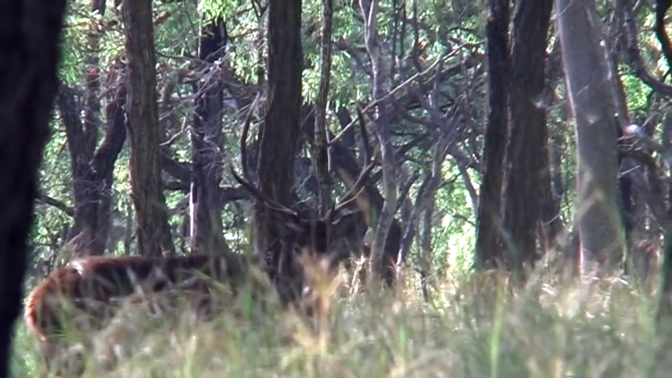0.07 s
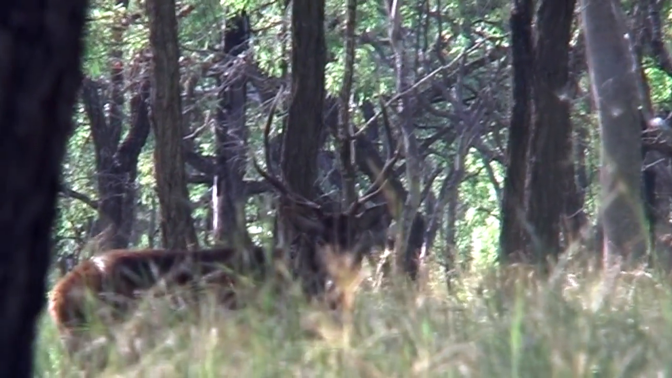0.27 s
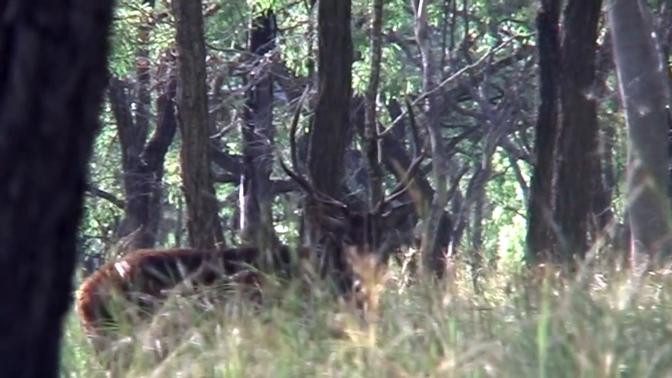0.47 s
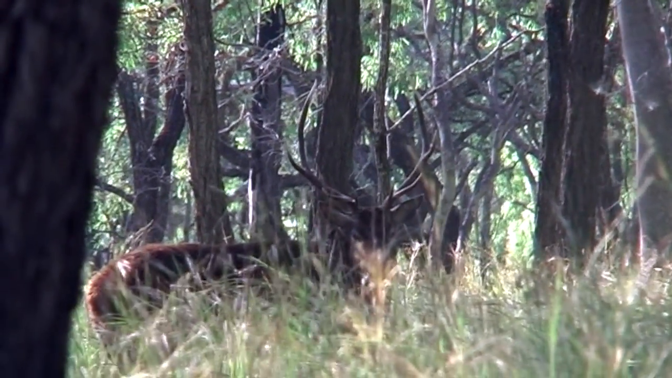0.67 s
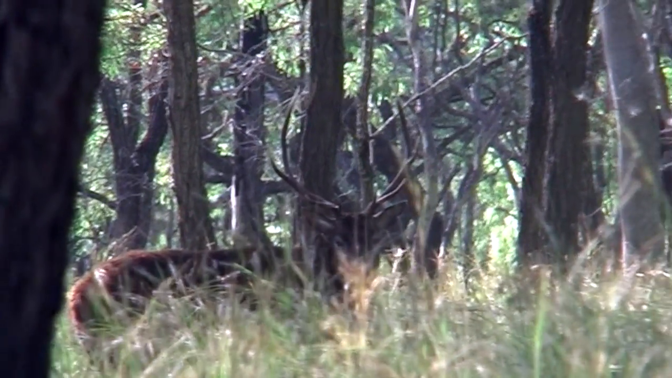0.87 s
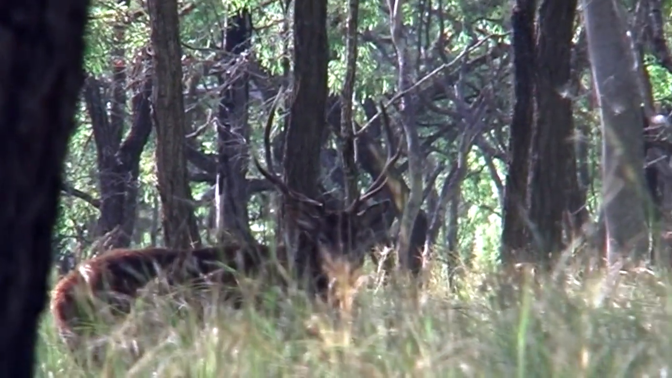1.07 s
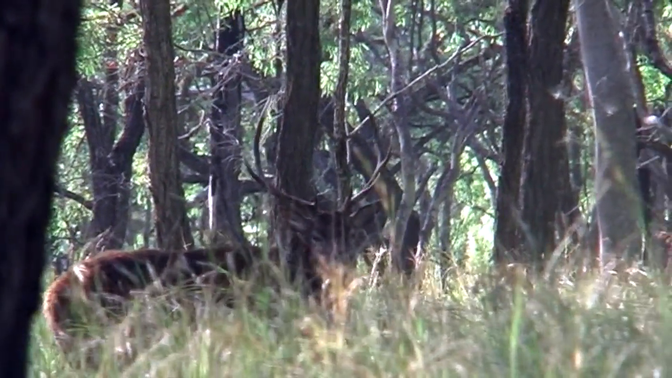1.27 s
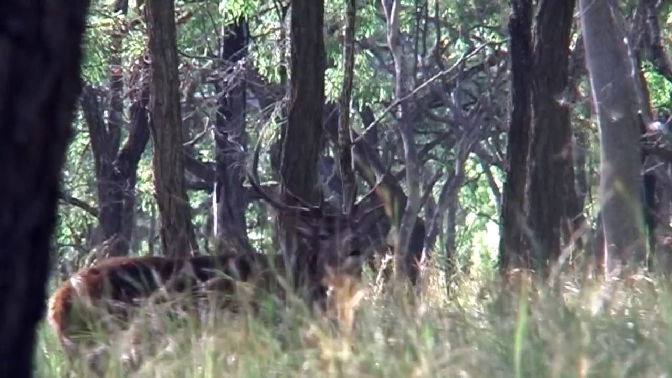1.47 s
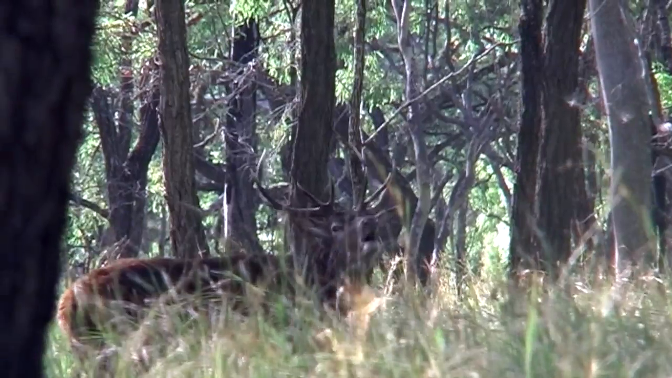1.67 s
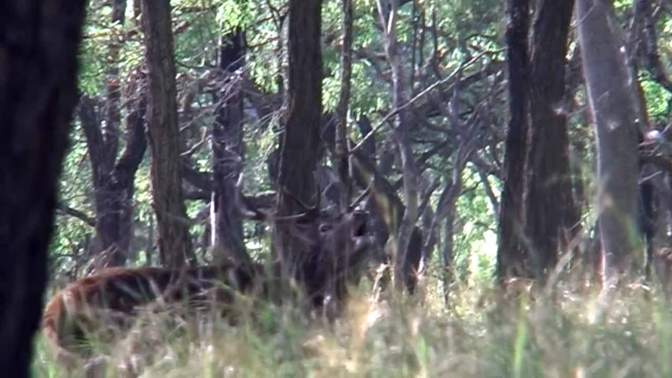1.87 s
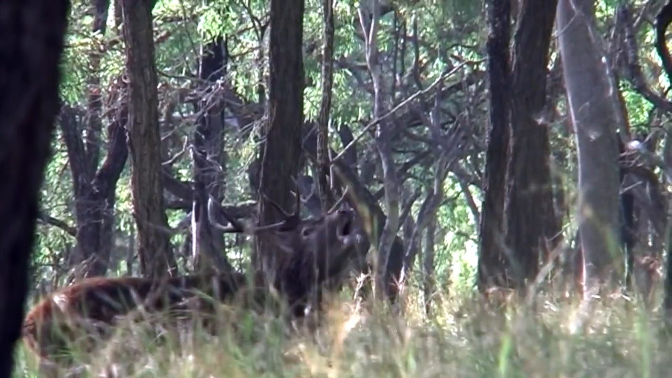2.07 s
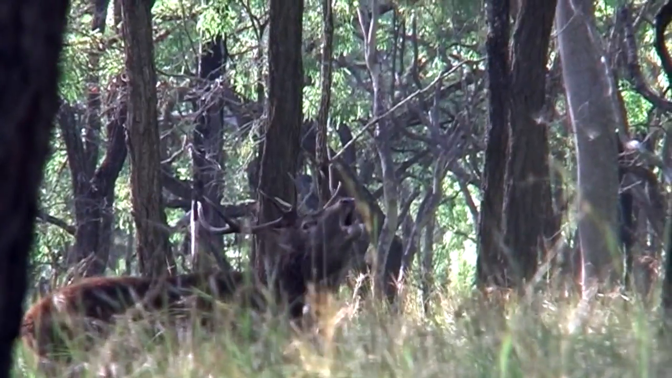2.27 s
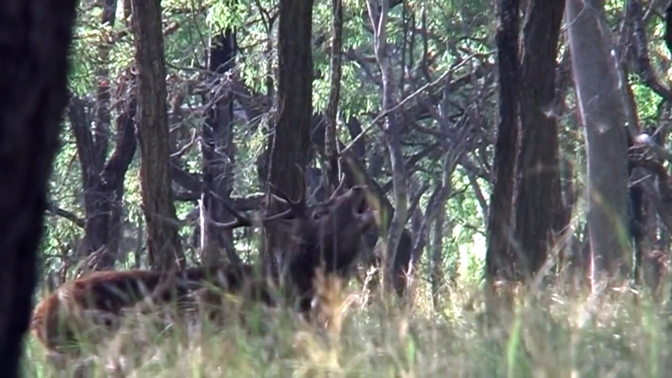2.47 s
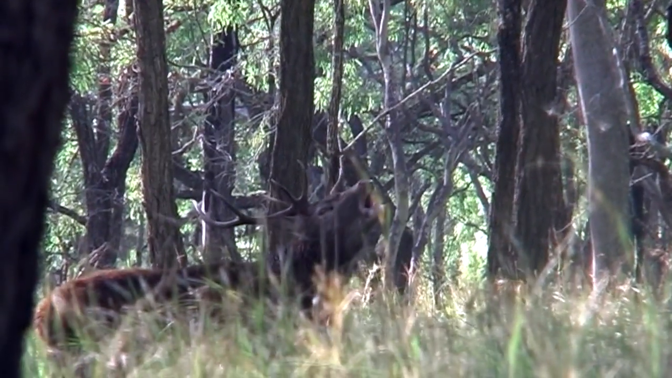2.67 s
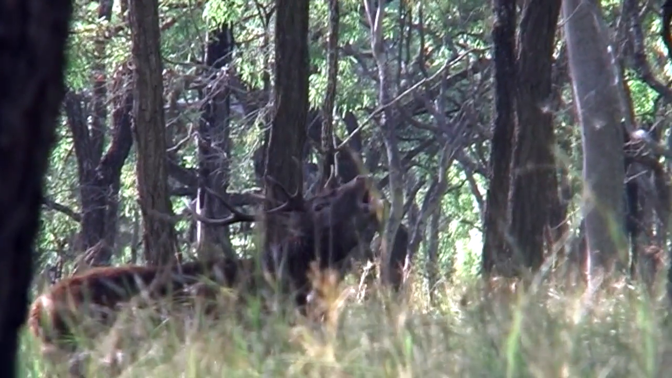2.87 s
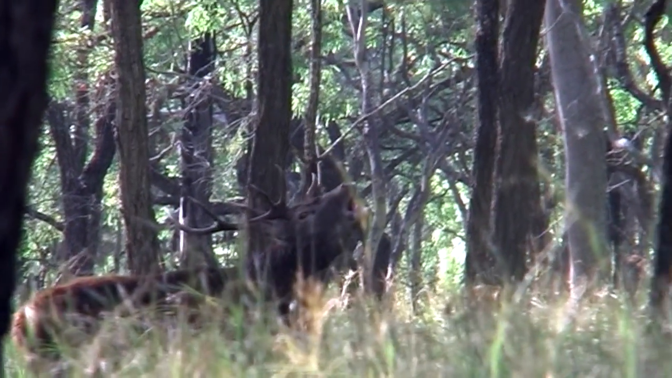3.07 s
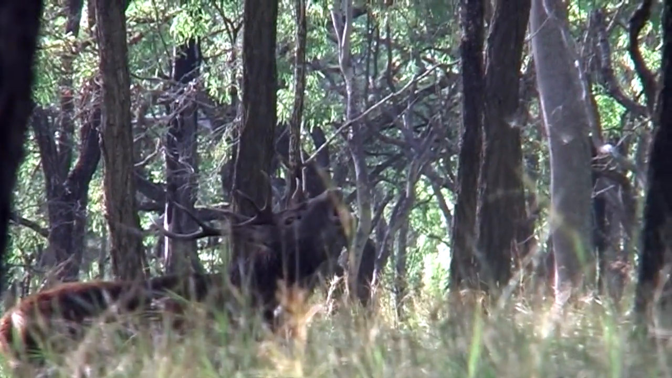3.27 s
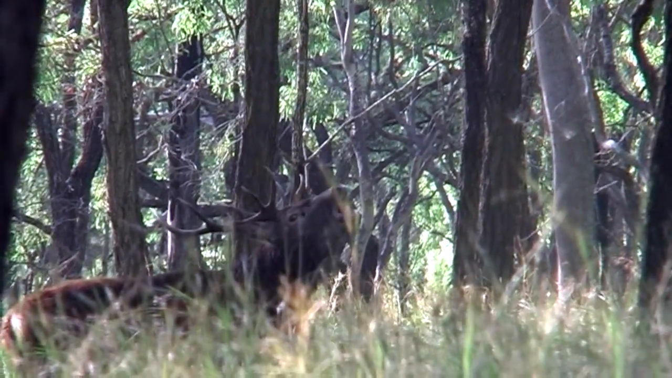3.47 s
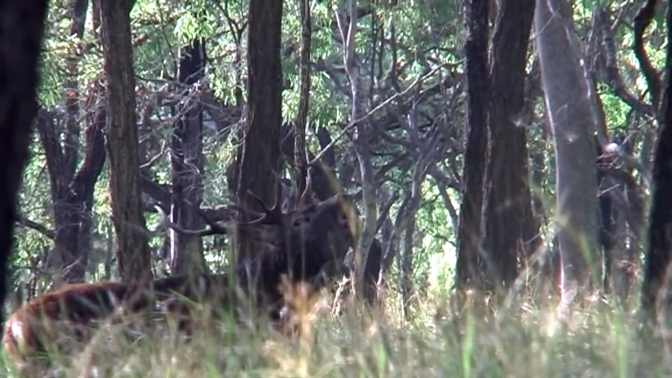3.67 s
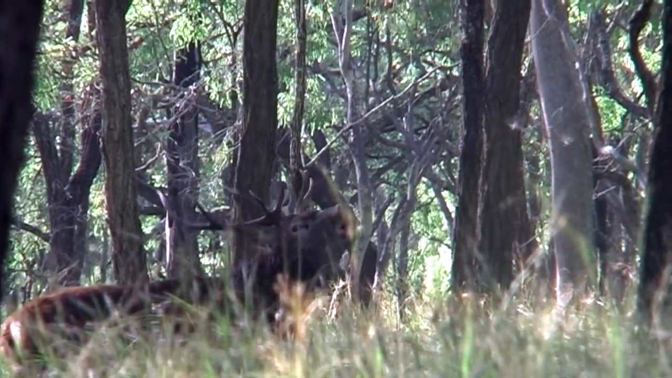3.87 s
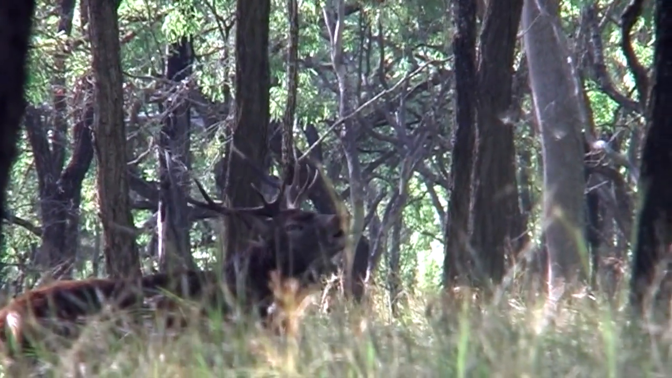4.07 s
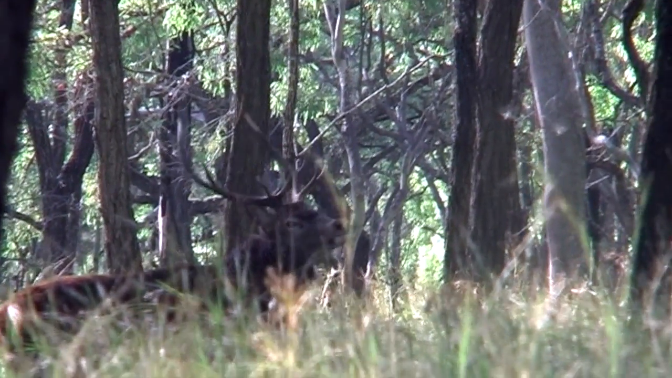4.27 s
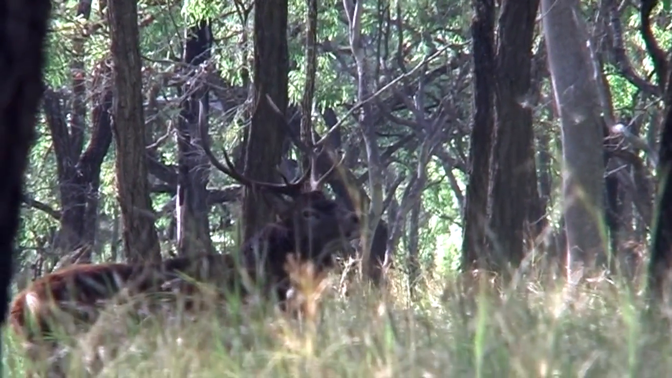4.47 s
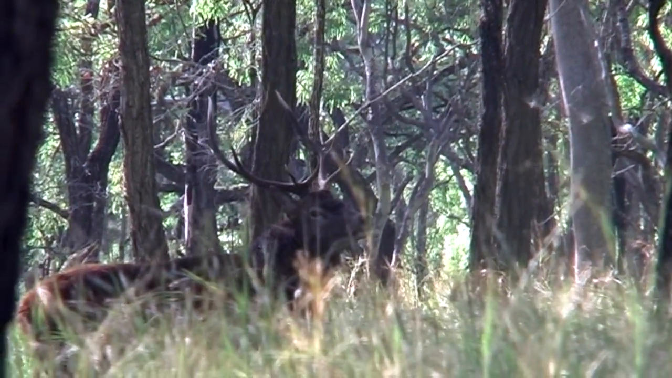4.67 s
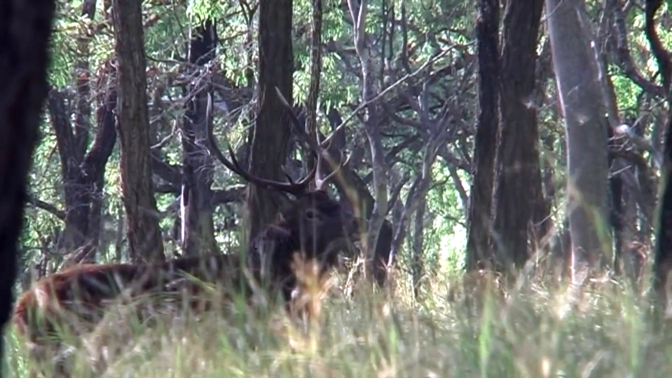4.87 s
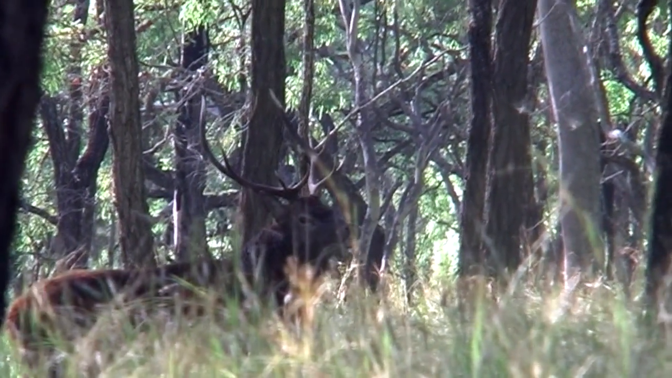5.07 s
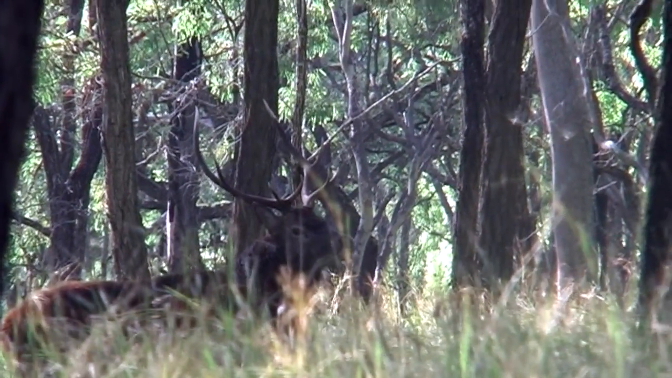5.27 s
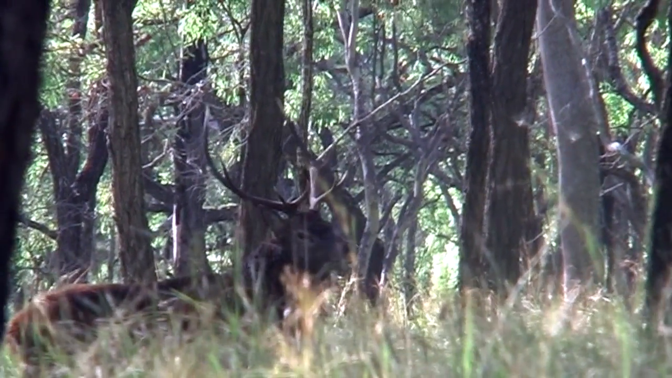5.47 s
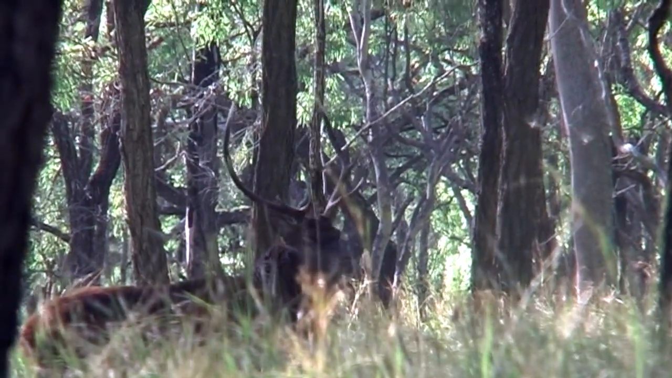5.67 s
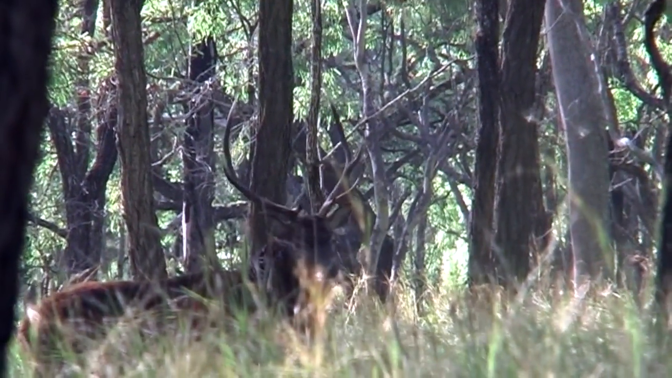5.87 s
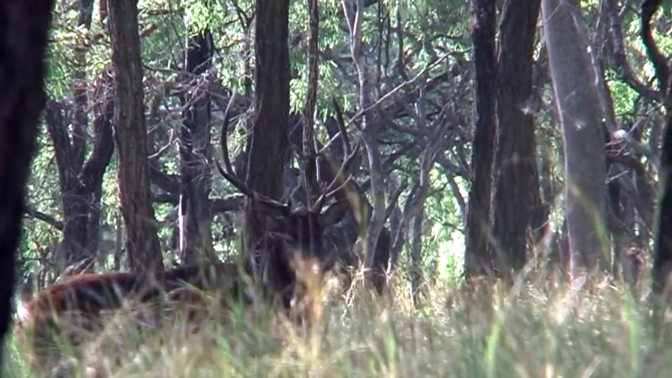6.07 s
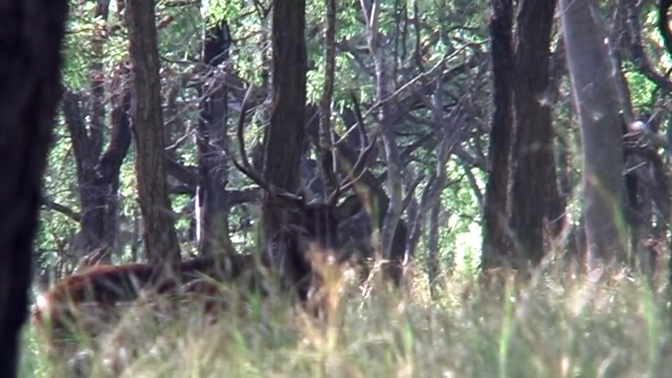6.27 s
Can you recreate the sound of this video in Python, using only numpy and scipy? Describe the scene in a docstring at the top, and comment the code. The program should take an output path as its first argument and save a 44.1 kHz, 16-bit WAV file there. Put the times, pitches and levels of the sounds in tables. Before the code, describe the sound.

One long, hoarse stag roar among trees ends in a husky breath, while birds whistle over soft hiss and a thin motor whine.

```python
"""A red deer stag roars once among trees: a rattling growl, a held hoarse hoot, then a husky breath.
Its vocal folds and a slower flapping chop the breath into puffs, which ring in its stretching throat.
Small birds whistle, something croaks far off, dry ticks sound, and the trunks add a short echo.
A camera's tape drive whines over the forest hush. The hush is louder around the roar;
the same quieter second of it opens and closes the scene, joined by short fades."""
import sys
import numpy as np
from scipy import signal
from scipy.fft import rfft, irfft, next_fast_len
from scipy.io import wavfile
from scipy.ndimage import uniform_filter1d, map_coordinates

SR = 44100
rng = np.random.default_rng(int(sys.argv[2]) if len(sys.argv) > 2 else 0)


def wav_record(signal):
    """Record a signal, one row per channel, as 16-bit PCM in the file named by sys.argv[1]."""
    frames = np.transpose(np.atleast_2d(signal))
    bounded = np.clip(frames, -1, 1)
    # unit amplitude maps onto the largest positive 16-bit level
    quanta = np.round(bounded * 32767).astype(np.int16)
    wavfile.write(sys.argv[1], SR, quanta)


N = 278712
T = np.arange(N) / SR
DRUM_HZ = 150  # hum of the tape drive's spinning head drum

# How strongly the stag's throat rings: (time [s], dark ringing [dB], bright ringing [dB])
ROAR_LEVELS = [(1.67, -33, -37.5), (1.71, -25, -28.5), (1.74, -26.5, -28), (1.84, -25.5, -25.5),
               (1.94, -29.5, -29), (2.18, -30, -25), (2.22, -34, -30), (2.27, -29, -31), (2.36, -26, -34.5),
               (2.4, -28, -31.5), (2.52, -32.5, -32), (2.6, -27.5, -31), (2.65, -34.5, -31),
               (3.23, -30, -31), (3.62, -31.5, -30.5), (3.74, -31, -31.5), (3.83, -38, -42.5),
               (3.93, -44, -37), (4.04, -36.5, -29.5), (4.1, -43, -51)]
# The note of the vocal folds: (time [s], pitch [Hz], level of the lowest tone [dB])
HOOT_NOTE = [(2.0, 164.8, -42), (2.1, 201.7, -33), (2.19, 217.7, -26.5), (2.28, 231.3, -19),
             (2.4, 234.2, -23), (2.46, 246.3, -25), (2.52, 257.9, -29.5), (2.97, 258.1, -29.5),
             (3.25, 254.9, -27), (3.5, 251.5, -30.5), (3.85, 243.3, -30), (3.94, 233.5, -23.5),
             (3.98, 207.7, -24.5), (4.04, 199.5, -50)]


def amp(db):
    """Turn decibels into a factor to multiply by."""
    return 10 ** (np.asarray(db) / 20)


def unit(x):
    """Scale x to an average power of 1."""
    return x / np.sqrt(np.mean(x ** 2) + 1e-20)


def steady(x, span_s=0.029):
    """Even out the loudness of x from moment to moment."""
    return x / np.sqrt(np.abs(uniform_filter1d(x ** 2, int(span_s * SR))) + 1e-9)


def curves(rows):
    """Join a table's points with straight lines: one curve for each column after the time."""
    times, *columns = np.transpose(rows)
    return [np.interp(T, times, column) for column in columns]


def sounding(rows, fade_s=0.012):
    """1 from a table's first time to its last and 0 outside, with soft ends."""
    return np.clip(np.minimum(T - rows[0][0], rows[-1][0] - T) / fade_s + .5, 0, 1)


def swells(rows, attack_s, release_s):
    """A loudness curve that rises, holds and dies away for each (start [s], length [s], level [dB])."""
    return sum(amp(db) * np.clip((T - start) / attack_s, 0, 1)
               * np.exp(-np.maximum(T - start - length, 0) / release_s) for start, length, db in rows)


def wobble(rate):
    """A smooth random curve with `rate` new values a second."""
    return map_coordinates(rng.standard_normal(int(N * rate / SR) + 4), [T * rate])


def sine(cycles):
    """A pure tone of power 1, from a running count of its cycles."""
    return np.sqrt(2) * np.sin(2 * np.pi * cycles)


def filtered(x, response):
    """Multiply each frequency in x by response(frequency)."""
    size = next_fast_len(N + SR // 2)
    return irfft(rfft(x, size) * response(np.fft.rfftfreq(size, 1 / SR)), size)[..., :N]


def ring(x, resonances):
    """Let x ring in steep resonances (centre [Hz], width [Hz], level [dB]); the result has power 1."""
    def response(f):
        return sum((-1) ** k * amp(db) * (1j * f * width / (hz * hz - f * f + 1j * f * width)) ** 2
                   for k, (hz, width, db) in enumerate(resonances))
    return unit(filtered(x, response))


def noise_in(resonances):
    """Random hiss coloured by resonances."""
    return ring(rng.standard_normal(N), resonances)


def whine_filter(x):
    """The camera's filter against its own whine thins narrow bands at even multiples of the drum's hum."""
    step_hz, half_width_hz, depth = 2 * DRUM_HZ, 43, 0.36

    def response(f):
        distance_hz = (f + step_hz / 2) % step_hz - step_hz / 2
        return 1 - depth * (f > 1.5 * step_hz) * np.exp(-(distance_hz / half_width_hz) ** 2)
    return filtered(x, response)


def forest_hush():
    """Forest air: a soft hiss that comes and goes in small patches of time and pitch."""
    # The colour of the hush: (frequency [Hz], relative level [dB])
    colour = [(100, -12.5), (170, -16), (586, -5.5), (821, -4), (1010, -5.5), (2140, -6), (2530, -4),
              (3230, -5.5), (4040, -6), (4870, -13), (6450, -15), (10000, -26.5), (14700, -27.5)]
    hz, db = np.transpose(colour)
    spectrum = signal.stft(rng.standard_normal(N), nperseg=512)[2]
    patches = uniform_filter1d(rng.standard_normal(spectrum.shape), 5, axis=0)
    patches = uniform_filter1d(patches, 10, axis=1)
    hiss = signal.istft(spectrum * amp(1.66 * unit(patches)), nperseg=512)[1][:N]
    return amp(-51) * unit(filtered(hiss, lambda f: amp(np.interp(np.log(f + 1), np.log(hz + 1), db))))


def drive_buzz():
    """Noise from the tape drive rings in the camera's body."""
    # The body's resonances: (centre [Hz], width [Hz], level [dB])
    body = [(247, 140, -64), (831, 124, -56), (2533, 380, -60.5), (3440, 310, -62), (6370, 140, -72)]
    return sum(amp(db + 3.5 * wobble(30)) * noise_in([(hz, width, 0)]) for hz, width, db in body)


def drive_whine():
    """The drum and a faster motor whine; all tones drift together with the drive's speed."""
    # Tones of the head drum: (multiple of its hum, level [dB])
    drum_tones = [(12, -70), (20, -69), (23, -61), (30, -66), (38, -74), (42, -71), (44, -78), (46, -78),
                  (54, -75), (56, -80), (58, -82), (60, -86), (64, -83), (66, -83), (82, -86), (92, -86),
                  (94, -86), (96, -91)]
    # Tones of the motor: (multiple of motor_hz, level [dB])
    motor_hz, motor_tones = 511.9, [(5, -61), (6, -71), (7, -63), (8, -58), (9, -73)]
    # Other tones of the drive: (pitch [Hz], level [dB])
    stray_tones = [(2622, -68), (2724, -69), (2896, -66), (3381, -69), (4048, -70), (3795, -64),
                   (3967, -68), (4000, -66), (4140, -71), (7267, -79)]
    tones = [(k * DRUM_HZ, db) for k, db in drum_tones]
    tones += [(k * motor_hz, db) for k, db in motor_tones] + stray_tones
    drive_time = np.cumsum(1 + 0.00014 * wobble(7.9)) / SR
    shimmer = amp(2.6 * wobble(20))  # shifted in time for each tone
    return sum(amp(db) * np.roll(shimmer, int(lag * N)) * sine(hz * drive_time + phase)
               for (hz, db), (phase, lag) in zip(tones, rng.random((len(tones), 2))))


def far_croaks():
    """Short bursts of noise ring in two resonances."""
    # The croaks: (time [s], level [dB])
    croaks = [(.48, -49), (.79, -50), (5.17, -48)]
    loudness = sum(amp(db) * np.exp(-((T - time) / .028) ** 2) for time, db in croaks)
    return loudness * noise_in([(1344, 150, -0.78), (1614, 220, -0.69)])


def whistles(notes, glide_s, attack_s, release_s, waver, flutter_db, rate):
    """Bird notes that slide from a first pitch to a last, trembling in pitch and loudness."""
    out = np.zeros(N)
    bend = 1 + waver * wobble(rate)
    flutter = amp(flutter_db * wobble(rate / 2))
    for start, length, first_hz, last_hz, db in notes:
        hz = last_hz + (first_hz - last_hz) * np.exp(-np.maximum(T - start, 0) / glide_s)
        loudness = flutter * swells([(start, length, db)], attack_s, release_s)
        out += loudness * sine(np.cumsum(hz * bend) / SR)
    return out


def far_bird():
    """A distant bird gives faint, falling cheeps."""
    # The cheeps: (start [s], level [dB])
    cheeps = [(.5, -52), (4.44, -50), (4.96, -49)]
    notes = [(start, .04, 2450, 2200, db) for start, db in cheeps]
    return whistles(notes, glide_s=.0172, attack_s=.038, release_s=.019,
                    waver=.0117, flutter_db=6.5, rate=310)


def near_birds():
    """Three small birds: one pipes falling notes, one whistles plainly, one trills roughly."""
    # The piping calls: (start [s], level [dB])
    pipes = [(1.01, -43), (1.283, -45), (1.568, -37.5), (4.151, -43.5), (4.47, -47), (5.075, -55)]
    # The plain whistles: (start [s], length [s], first pitch [Hz], last pitch [Hz], level [dB])
    plain_notes = [(1.51, 0.036, 4730, 4700, -55), (1.555, .03, 4750, 5060, -52),
                   (3.9, .11, 5000, 4800, -45), (4.16, 0.084, 4900, 4870, -40)]
    # The trills: (start [s], length [s], first pitch [Hz], last pitch [Hz], level [dB])
    trills = [(4.53, 0.13, 5870, 5840, -46), (4.73, 0.042, 5870, 5890, -48.5),
              (4.88, 0.069, 6100, 6260, -45), (4.92, 0.065, 6280, 6340, -46), (5.0, 0.052, 6300, 6200, -59)]
    pipe_notes = [(start, .07, 3000, 2480, db) for start, db in pipes]
    piper = whistles(pipe_notes, glide_s=.017, attack_s=.04, release_s=.05,
                     waver=.005, flutter_db=2.5, rate=250)
    whistler = whistles(plain_notes, glide_s=.03, attack_s=.07, release_s=.055,
                        waver=.003, flutter_db=2.1, rate=250)
    triller = whistles(trills, glide_s=.038, attack_s=.06, release_s=.058,
                       waver=.0064, flutter_db=4, rate=400)
    return piper + whistler + triller


def dry_ticks():
    """Each small tick rings the same few high tones, which die at once."""
    # The ticks: (time [s], relative level [dB])
    ticks = [(1.093, -28.5), (1.193, -52), (1.655, -44), (2.74, -45)]
    # The tones in a tick: (pitch [Hz], relative level [dB], time to fade by 60 dB [s])
    tones = [(7320, 1.5, .009), (8250, 3, 0.013), (10500, -22, .008), (13000, -9, .012)]
    out, t = np.zeros(N), np.arange(SR // 40) / SR
    tick = sum(amp(db - 60 * t / fade_s) * np.sin(2 * np.pi * hz * t) for hz, db, fade_s in tones)
    tick *= 1 - np.exp(-t / 0.00013)
    for time, db in ticks:
        out[round(time * SR):][:len(t)] += amp(db - 0.5) * tick
    return out


def wheeze():
    """The stag draws a thin breath before it roars."""
    # The breath in: (start [s], length [s], level [dB])
    intake = [(1.55, 0.079, -42.5)]
    return swells(intake, attack_s=.022, release_s=.016) * noise_in([(1660, 440, 0)])


def puffs(cycles, sharp):
    """One smooth puff of air per cycle; a larger `sharp` makes it narrower."""
    return np.exp(sharp * (np.cos(2 * np.pi * cycles) - 1))


def chest_growl(pulses):
    """The growl surges in the deep resonances at the chest end of the throat."""
    # The surges: (start [s], length [s], level [dB])
    surges = [(1.59, 0.071, -44.5), (1.66, 0.05, -33), (1.75, 0.17, -30), (1.89, 0.094, -31.5),
              (2.02, 0.15, -36), (4.01, 0.023, -29)]
    # The deep resonances: (centre [Hz], width [Hz], relative level [dB])
    chest = [(105, 50, -22), (232, 80, 0), (345, 70, -17)]
    return swells(surges, attack_s=.035, release_s=.03) * steady(ring(pulses, chest), span_s=.07)


def throat(voice, breath, growl, air):
    """The voice rings in the throat, whose dark, bright and top resonances move as the neck stretches."""
    # Resonances, early in the roar and once the neck is held: (centre [Hz], width [Hz], level [dB])
    dark_early = [(498, 57, -15), (928, 34, -2), (1081, 125, -4.5), (1323, 95, -16), (1540, 103, -10),
                  (1698, 155, -18)]
    dark_held = [(463, 210, -22), (879, 46, 5.5), (1103, 77, -5.5), (1260, 180, -8.5), (1453, 37, 4),
                 (1727, 68, 5)]
    top_early = [(3530, 160, -2), (3800, 110, -3), (4380, 250, 1.5), (5200, 510, -13.5)]
    top_held = [(3640, 134, -1.5), (4370, 300, 4.5), (5300, 750, -12), (7240, 1800, -26.5)]
    # Bright resonances, one list for each of four neck postures: (centre [Hz], width [Hz], level [dB])
    bright_shapes = [
        [(1970, 120, 3.5), (2278, 90, 5), (2460, 125, 3.5), (2805, 100, 7), (3110, 130, 3)],
        [(2036, 200, -3.5), (2310, 85, -2), (2536, 120, 5.5), (2743, 144, 3), (3005, 160, -8.5),
         (3200, 92, -3.5)],
        [(2027, 150, -2.5), (2330, 140, -2.5), (2564, 156, -3), (2875, 95, -5.5), (3130, 59, -3)],
        [(1990, 110, -5), (2255, 170, -1.5), (2458, 180, -1.5), (2767, 100, -2), (3050, 120, -6)],
    ]
    # Resonances that sit higher before the full stretch: (centre [Hz], width [Hz], level [dB])
    raised = [(2890, 150, 1), (3255, 180, -4), (3465, 130, -9)]
    # Snarls in those raised resonances: (start [s], length [s], level [dB])
    snarls = [(1.7, 0.16, -35.5), (1.95, 0.046, -41)]
    # The neck stretching: (time [s], share of the held shape [0-1])
    stretch = [(2.38, 0.2), (2.55, 0.68)]
    # The neck's posture, blending from one to the next: (time [s], posture [0-3])
    postures = [(1.8, 0), (1.88, 1), (2.2, 1), (2.45, 2), (2.75, 2), (3.4, 3), (3.82, 3), (3.9, 1)]
    # The rasp of the top resonances: (time [s], level [dB])
    rasp = [(1.67, -58), (1.8, -51), (2.0, -46), (2.12, -38), (2.35, -43), (2.55, -44), (3.0, -44),
            (3.4, -47.5), (3.62, -43), (3.8, -46), (4.04, -42), (4.1, -56)]
    (held,), (posture,), (rasp_db,) = curves(stretch), curves(postures), curves(rasp)
    dark_db, bright_db = curves(ROAR_LEVELS)

    def stretching(x, early, late):
        return steady((1 - held) * ring(x, early) + held * ring(x, late), span_s=.1)

    # The held neck lets more breath noise into the dark resonances.
    dark = stretching(voice + .9 * held * air * breath, dark_early, dark_held)
    bright = sum(np.clip(1 - abs(posture - k), 0, 1) * ring(voice, shape)
                 for k, shape in enumerate(bright_shapes))
    top = amp(rasp_db) * stretching(voice + breath, top_early, top_held)
    surge_db = 2.5 * growl * air
    dark *= amp(dark_db + surge_db * wobble(30.06))
    bright = amp(bright_db + surge_db * wobble(30.06)) * steady(bright, span_s=.1)
    snarl = swells(snarls, attack_s=.029, release_s=.043) * steady(ring(voice, raised), span_s=.09)
    return sounding(ROAR_LEVELS, fade_s=.00088) * (dark + bright + top) + snarl


def ground_bounce(x, delay_s=0.000825):
    """A slightly later copy bounces off the ground and weakens evenly spaced frequencies."""
    return filtered(x, lambda f: (1 + 0.43 * np.exp(-2j * np.pi * f * delay_s)) / 1.144)


def hoot(fold_cycles, ragged_cycles, hoot_db, air):
    """The vocal folds hold a note, with low breath noise ringing beside it."""
    # The octave above stands out as the voice clears: (start [s], length [s], level [dB])
    octave_swell = [(3.25, 0.66, -47)]
    # The low breath noise: (start [s], length [s], level [dB])
    undertone = [(2.45, 1.18, -43)]
    # Its resonances, under and over the note: (centre [Hz], width [Hz], relative level [dB])
    breast = [(229, 43, 2.5), (390, 140, -12)]
    octave_gain = swells(octave_swell, attack_s=.35, release_s=.03) * amp(air * (12 * wobble(25) - 10))
    note = amp(hoot_db + 1.26 * wobble(24.67)) * sine(fold_cycles)
    octave = octave_gain * sine(2 * ragged_cycles)
    low_breath = swells(undertone, attack_s=.2, release_s=.028) * noise_in(breast)
    return sounding(HOOT_NOTE) * (note + octave) + low_breath


def husky_breath():
    """Breath rushes unevenly through the open mouth as the roar ends."""
    # The breaths: (start [s], length [s], level [dB])
    breaths = [(3.31, 0.032, -29), (3.5, 0.12, -33.5), (3.77, 0.2, -35.5), (3.96, 0.26, -36.5)]
    # The mouth's resonances: (centre [Hz], width [Hz], relative level [dB])
    mouth = [(490, 240, -11), (1337, 176, 0), (1553, 310, -4)]
    return swells(breaths, attack_s=.04, release_s=.03) * amp(2.5 * wobble(30)) * noise_in(mouth)


def stag():
    """Vocal folds pulse while a slower, uneven flap growls; gives the roar's upper and lower parts."""
    # What the voice is made of: (time [s], share of growl [0-1], share of breath noise [0-1])
    voicing = [(1.745, 1, .07), (1.77, 1, .3), (1.93, 1, .33), (1.97, 1, .5), (2.12, .9, .5),
               (2.26, .12, .2), (2.36, .12, .2), (2.4, .4, .46), (3.45, .25, .3), (3.66, .02, .03),
               (3.84, .03, .08), (3.92, .15, .2), (4.0, .3, .4)]
    # The growl's flapping: (time [s], rate [Hz])
    flap_rate = [(1.67, 80), (1.745, 100), (1.82, 101), (1.875, 116), (1.92, 108), (1.97, 122), (2.03, 105),
                 (2.1, 103), (2.28, 82)]
    pitch_hz, hoot_db = curves(HOOT_NOTE)
    (growl, air), (flap_hz,) = curves(voicing), curves(flap_rate)
    fold_cycles = np.cumsum(pitch_hz * (1 + 0.0027 * wobble(30))) / SR
    ragged_cycles = fold_cycles + .06 * air * wobble(60)  # more air makes the cycles less even
    flap_cycles = np.cumsum(flap_hz * (1 + .25 * air * wobble(60))) / SR
    flap_cycles -= flap_cycles[round(ROAR_LEVELS[0][0] * SR) + 90]  # the roar opens on a slap
    throb = puffs(flap_cycles, sharp=1.3)  # the flap also shakes the fold pulses and the breath
    fold_pulses = puffs(ragged_cycles, sharp=1800) * amp(air * wobble(100))
    fold_pulses = steady(fold_pulses * (1 - growl + 0.19 * growl * throb))
    slaps = steady(puffs(flap_cycles, sharp=4000) * amp(3 * air * wobble(90)))
    airflow = (1 - growl) * puffs(ragged_cycles, sharp=1.3) + growl * throb
    breath = 1.6 * steady(rng.standard_normal(N) * airflow)
    pulses = np.sqrt(1 - growl) * fold_pulses + np.sqrt(growl) * slaps
    voice = np.sqrt(1 - air) * pulses + np.sqrt(air) * breath
    voice *= sounding(ROAR_LEVELS, fade_s=.0013) + .001
    upper = ground_bounce(throat(voice, breath, growl, air))
    lower = chest_growl(slaps + 1.2 * air * breath) + hoot(fold_cycles, ragged_cycles, hoot_db, air)
    return upper + husky_breath() + wheeze(), lower


def forest_echo(x, fade_s=.65):
    """Tree trunks scatter the sound into a short, dull echo."""
    t = np.arange(SR // 2) / SR
    tail = rng.standard_normal(len(t)) * amp(-60 * t / fade_s) * (1 - np.exp(-t / .006))
    echo = signal.fftconvolve(x, tail / np.linalg.norm(tail))[:N]
    return filtered(echo, lambda f: f / (f + 400) / (1 + (f / 5000) ** 2))


def scene():
    """The loud passage with the stag and near birds, between two matching quiet ones; one channel."""
    # The background's strength in the loud passage: (time [s], gain [factor])
    loud_fades = [(.98, 0), (1.06, 2.1), (5.24, 2.5), (5.392, 0)]
    # The quiet passages fading out and in: (time [s], gain [0-1])
    quiet_fades = [(0, 1), (.965, 1), (1.005, 0), (5.376, 0), (5.406, 1)]
    (loud_gain,), (quiet_gain,) = curves(loud_fades), curves(quiet_fades)
    bass_cut_hz, repeat_s = 189, 5.32
    roar_upper, roar_lower = stag()
    birds = near_birds()
    near = roar_upper + birds
    background = whine_filter(forest_hush() + drive_buzz()) + drive_whine()
    far = far_croaks() + far_bird()
    echo = forest_echo(amp(-8) * near + amp(-14) * roar_lower + amp(-2) * birds)
    loud = whine_filter(near + echo) + roar_lower + dry_ticks() + loud_gain * background + far * (T > 2)
    loud = filtered(loud, lambda f: 1 / np.sqrt(1 + (bass_cut_hz / (f + 1)) ** 6))
    low_wind = amp(-72.5) * noise_in([(161, 290, 0)])
    quiet = background + far + low_wind
    quiet = np.where(T < 2, quiet, np.roll(quiet, round(repeat_s * SR)))  # the opening comes back
    hum_gain = np.maximum(quiet_gain, np.clip(loud_gain, 0, 1))
    drum_hum = amp(-66.5) * hum_gain * sine(DRUM_HZ * T)
    return (loud + quiet_gain * quiet + drum_hum)[None]


def record(dry, top_hz=14700):
    """The camera lets no sound above top_hz through."""
    return filtered(dry, lambda hz: hz < top_hz)


dry = scene()
out = record(dry)
wav_record(out)
```